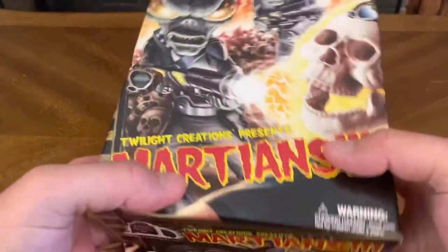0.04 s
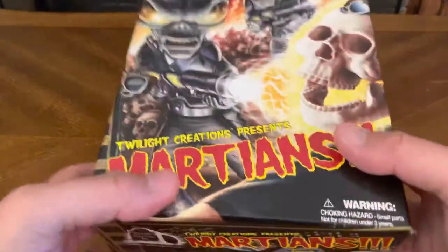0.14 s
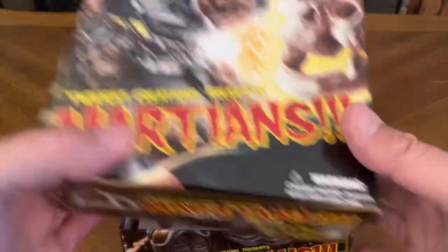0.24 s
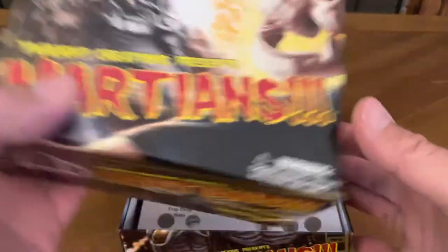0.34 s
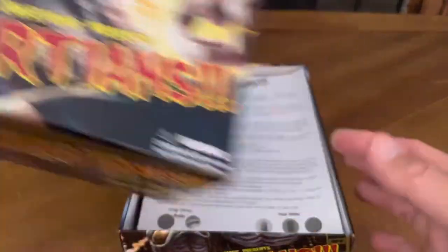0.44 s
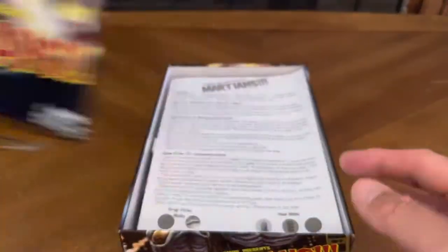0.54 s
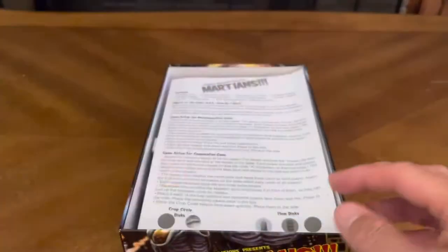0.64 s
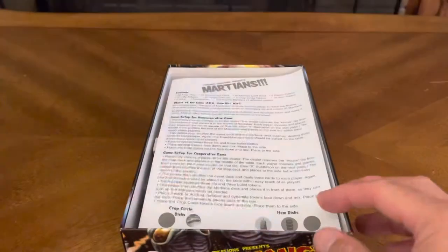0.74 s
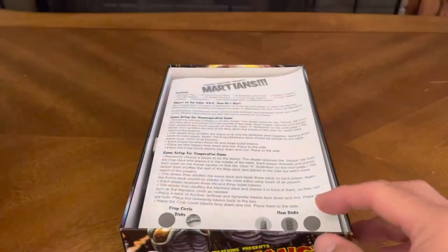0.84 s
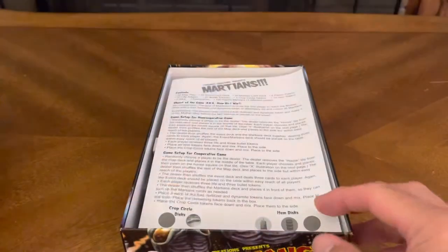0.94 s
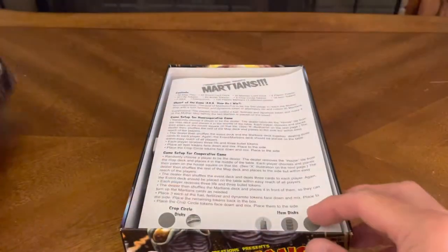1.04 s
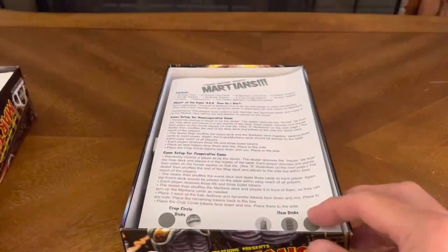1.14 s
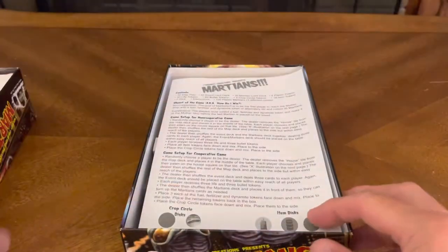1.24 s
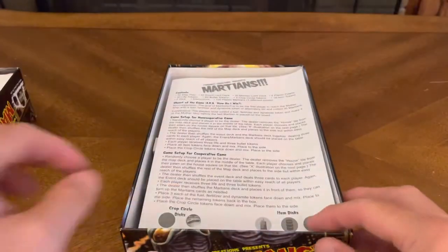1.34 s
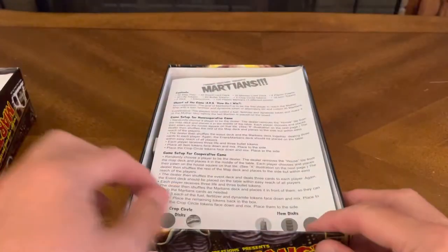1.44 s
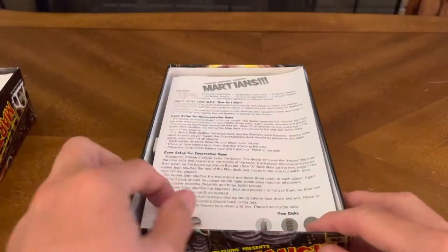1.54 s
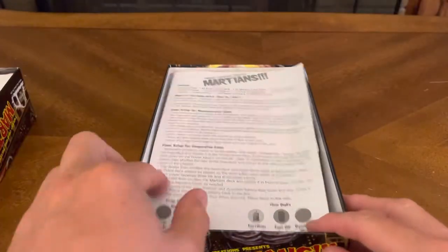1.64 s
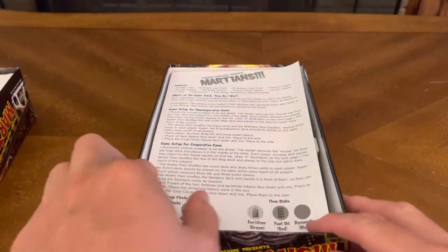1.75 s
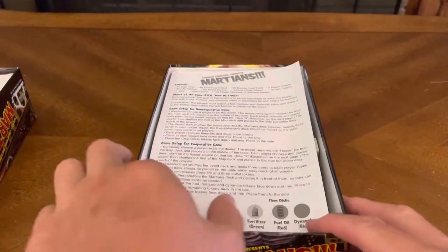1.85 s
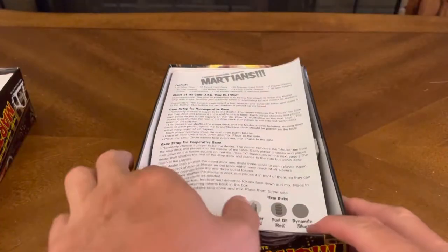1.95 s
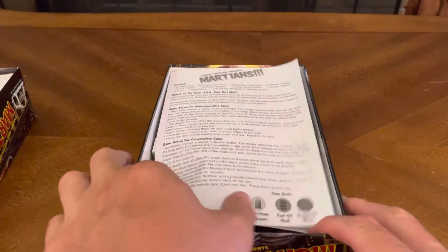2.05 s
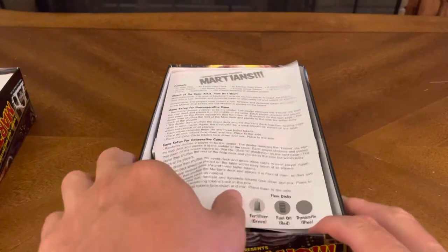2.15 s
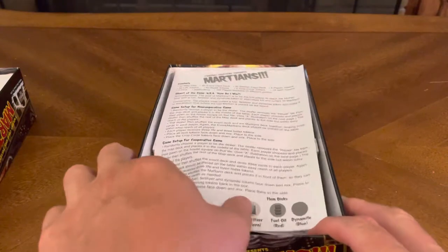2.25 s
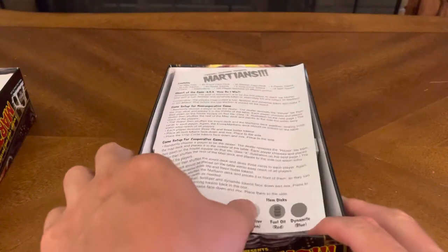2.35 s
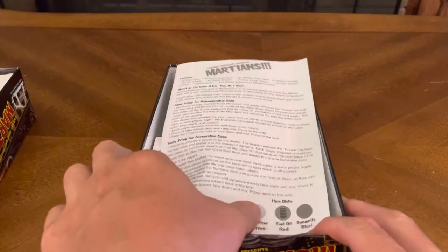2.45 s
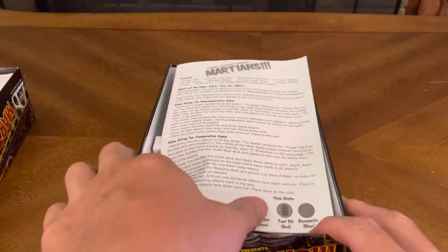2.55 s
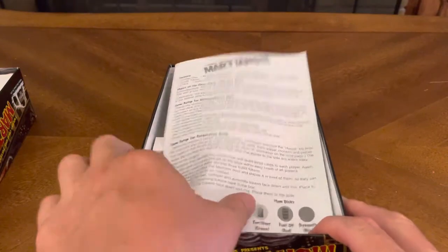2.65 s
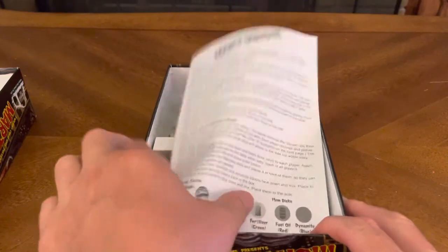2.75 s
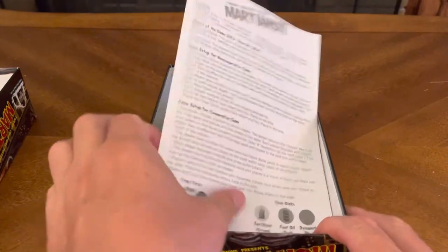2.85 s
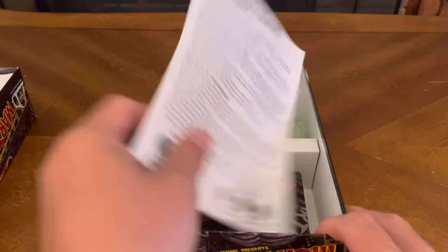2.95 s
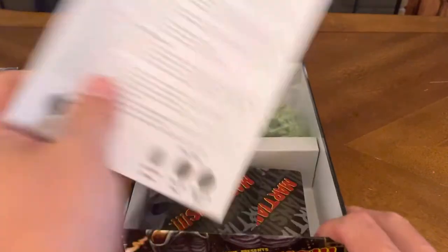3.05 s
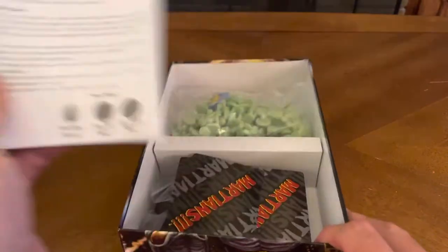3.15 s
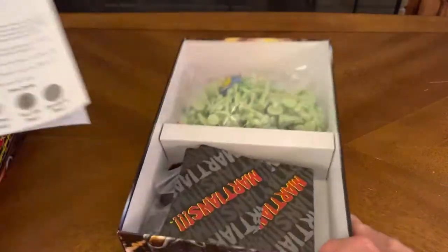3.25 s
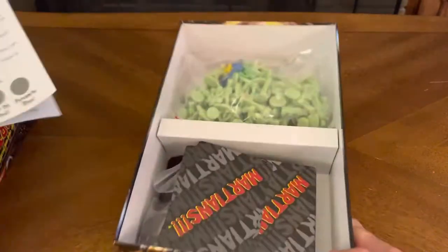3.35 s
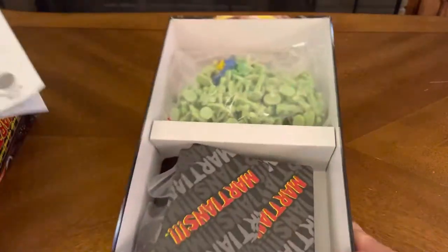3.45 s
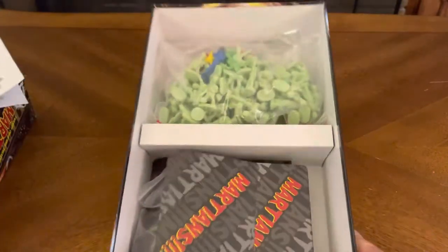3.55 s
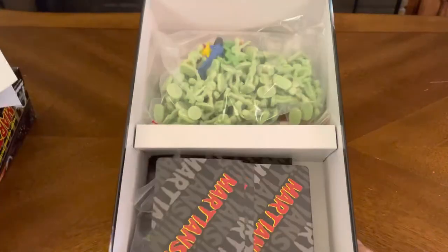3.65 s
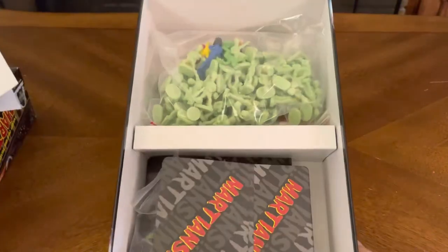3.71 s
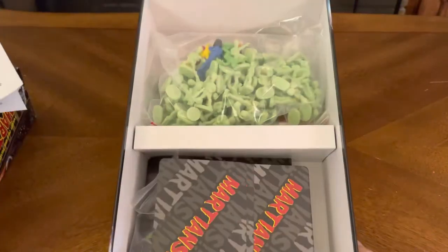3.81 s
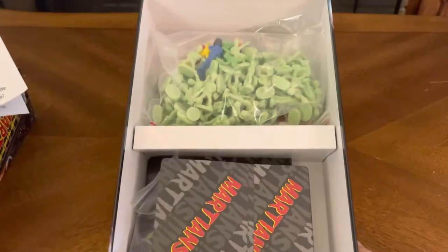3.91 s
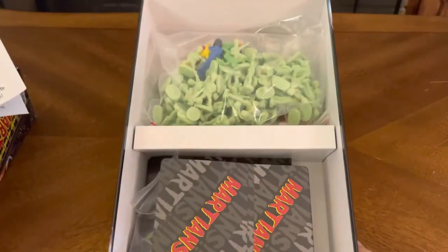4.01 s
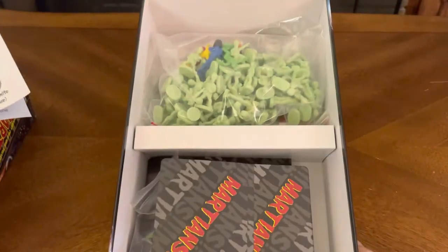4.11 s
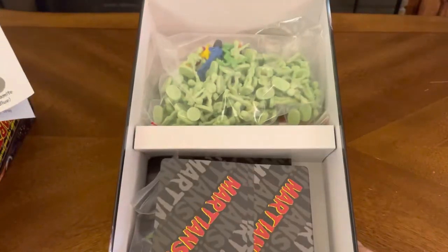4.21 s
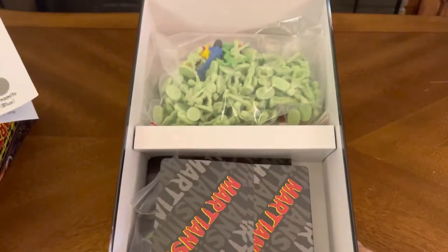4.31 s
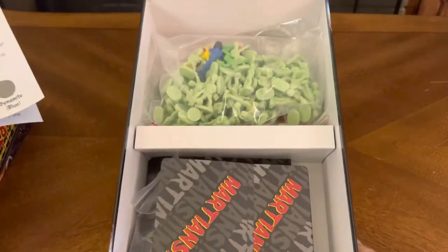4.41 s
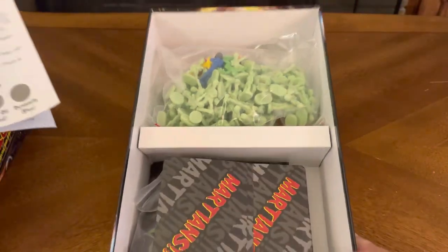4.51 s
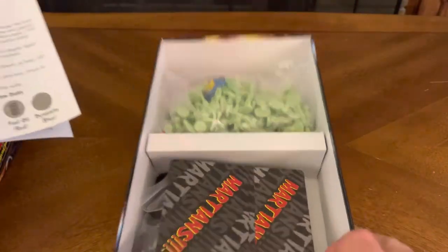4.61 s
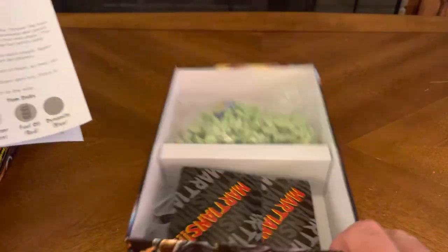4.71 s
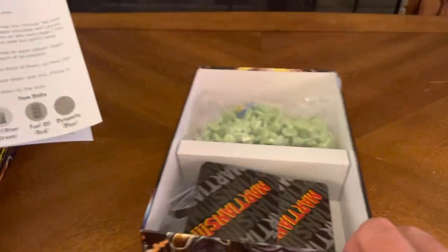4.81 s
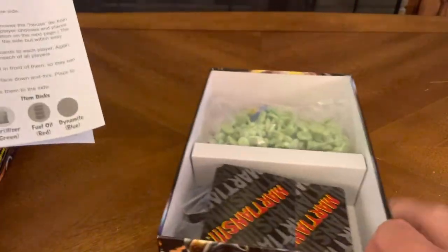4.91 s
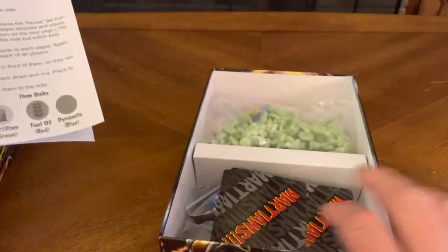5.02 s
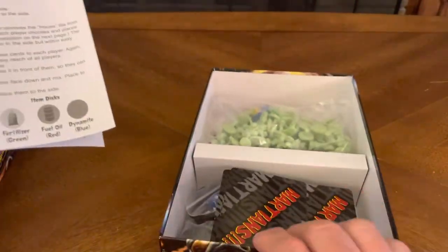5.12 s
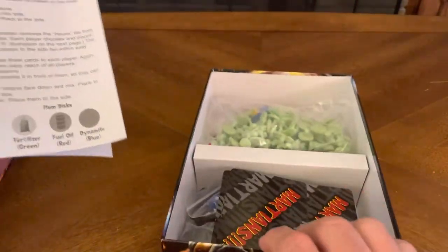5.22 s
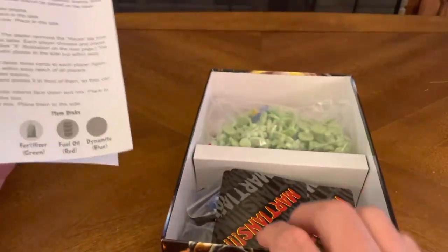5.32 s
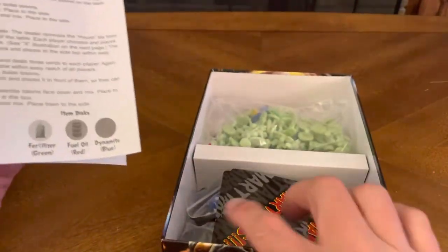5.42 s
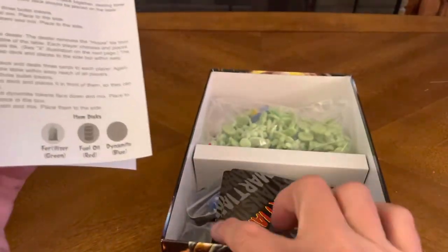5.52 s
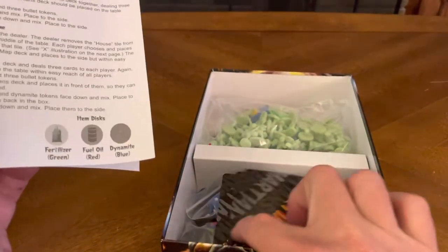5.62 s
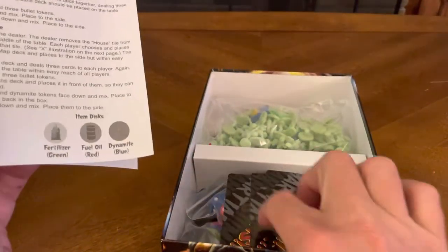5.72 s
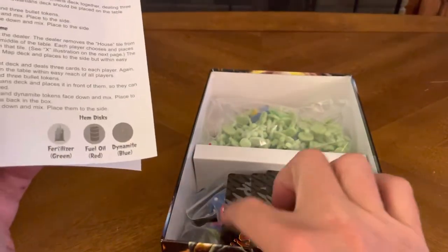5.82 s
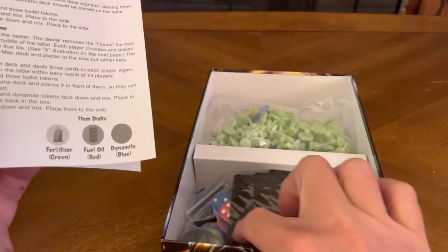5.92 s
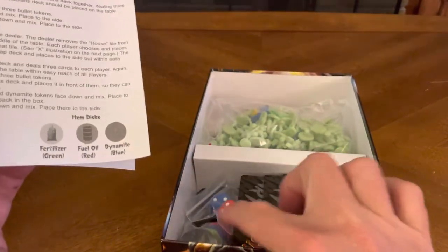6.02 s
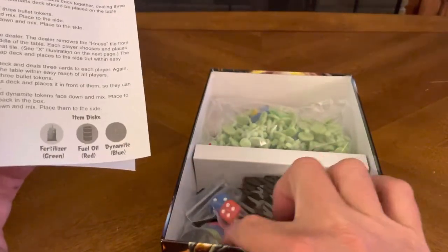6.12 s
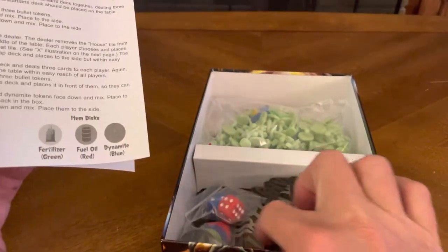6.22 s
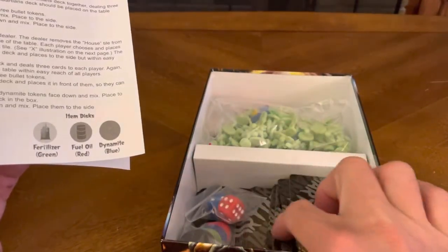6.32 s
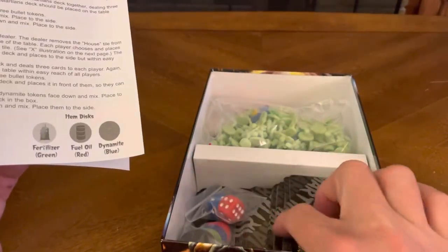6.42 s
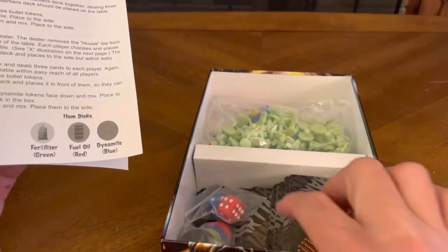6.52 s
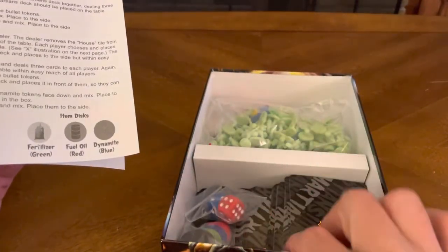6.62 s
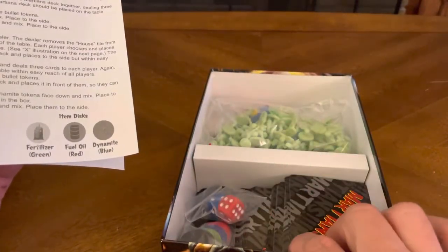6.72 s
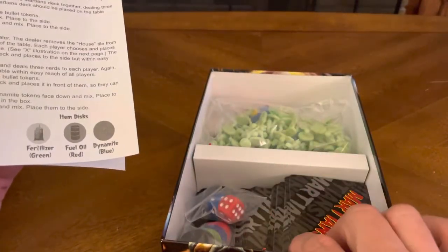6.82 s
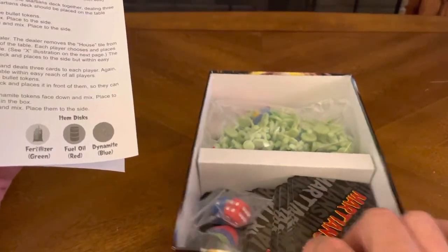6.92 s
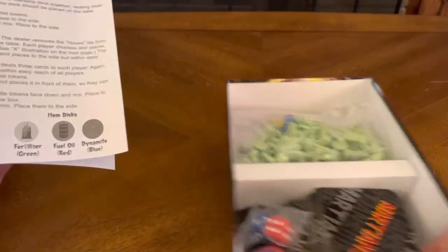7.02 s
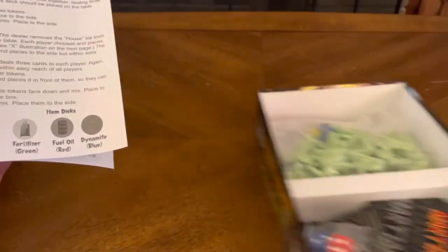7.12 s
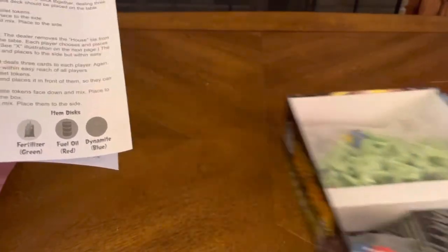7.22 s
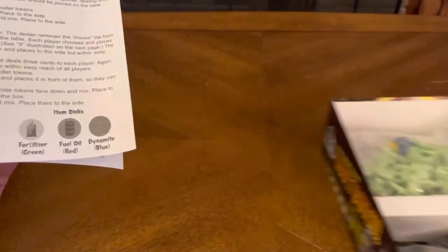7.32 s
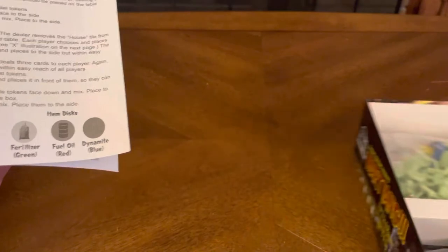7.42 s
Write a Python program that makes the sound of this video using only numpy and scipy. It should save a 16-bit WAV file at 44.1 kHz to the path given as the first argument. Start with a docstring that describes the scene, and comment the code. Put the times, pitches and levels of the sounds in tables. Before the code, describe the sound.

Close unboxing in a quiet humming room: lid knock, raspy booklet pulls, cardboard creaks, a hard box thud, card rustling, a final scrape.

```python
"""A cardboard game box is unpacked on a wooden table, in a quiet room with a low rumble and hum.
The lid drops and rocks on the table, then a paper booklet is pried out in separate, droning pulls.
The box creaks as it is tilted and lands flat; fingers sort through cards and a plastic bag.
At last the box scrapes away over the wood and judders to a stop.
Blows ring decaying modes, friction is coloured noise with grains, and two microphone ports hear it all."""
import sys
import numpy as np
from scipy import signal
from scipy.fft import rfft, irfft, next_fast_len
from scipy.io import wavfile
from scipy.ndimage import uniform_filter1d, map_coordinates

SR = 44100
rng = np.random.default_rng(int(sys.argv[2]) if len(sys.argv) > 2 else 0)


def put_to_file(sound):
    """Save the sound as 16-bit audio at rate SR, in the file named by the first command-line argument."""
    columns = np.atleast_2d(sound).T  # one column per channel
    safe = np.clip(columns, -1, 1)
    whole_steps = np.round(safe * 32767)
    wavfile.write(sys.argv[1], SR, whole_steps.astype(np.int16))


N = 328986
TIME = np.arange(N) / SR  # the whole scene, in seconds
HIT_TIME = np.arange(SR // 4) / SR  # one blow, in seconds

# Colour of a crack of board or paper. Each row: frequency in Hz, relative level in dB.
CRACK_COLOUR = [(300, -19.5), (1000, 0), (2400, 3), (4000, -5.5), (12000, -24)]


def amp(db):
    """Decibels to gain."""
    return 10 ** (np.asarray(db) / 20)


def unit(x):
    """Scaled to rms 1."""
    return x / np.sqrt(np.mean(x ** 2) + 1e-20)


def along(points, hz):
    """Read (Hz, value) points at any frequency, on a log axis."""
    f, v = np.transpose(points)
    return np.interp(np.log(hz + 1), np.log(f + 1), v)


def wobble(rate):
    """A smooth random curve, rate knots a second."""
    knots = rng.standard_normal(int(N * rate / SR) + 4)
    return map_coordinates(knots, [TIME * rate])


def filtered(x, response):
    """x times a response of frequency."""
    size = x.shape[-1]
    padded = next_fast_len(size + 8192)
    hz = np.fft.rfftfreq(padded, 1 / SR)
    return irfft(rfft(x, padded) * response(hz), padded)[..., :size]


def coloured(x, spectrum):
    """x given a spectrum, at rms 1."""
    return unit(filtered(x, lambda hz: amp(along(spectrum, hz))))


def add(track, s, sound):
    """Mix a sound in at s seconds."""
    part = track[max(round(s * SR), 0):][:len(sound)]
    part += sound[:len(part)]


def stroke(start, length):
    """Contact builds up, holds and lets go."""
    attack_s, release_s = 0.015, 0.047
    rise = (TIME - start) / attack_s + .5
    fall = (start + length - TIME) / release_s + .5
    return np.clip(np.minimum(rise, fall), 0, 1)


def swell(start, length):
    """A smooth rise and fall."""
    return np.abs(np.sin(np.pi * np.clip((TIME - start) / length, 0, 1)))


def in_room(x, wet_db=-13.0, early_t60=.07, wide_hz=180, dull_hz=7000):
    """Direct sound, early reflections of opposite sign at the two sides, and the room's tail.
    Each quarter-second stretch of sound gets freshly drawn random reflections and tail."""
    # Decay of the room. Each row: frequency in Hz, time to fall by 60 dB in seconds.
    room_decay = [(150, 0.26), (1000, 0.3), (14000, 0.21)]
    early_gain = amp(-4.5)
    sides = np.array([[1], [-1]])
    block = SR // 4
    out = np.tile(x, (2, 1))
    for start in range(0, N, block):
        part = x[start:start + block]
        if np.abs(part).max() < amp(-100):  # nothing to reflect
            continue
        hz, t, z = signal.stft(rng.standard_normal((2, SR // 2)), SR, nperseg=256)
        decaying = z * amp(-60 * t / along(room_decay, hz)[:, None])
        mid, side = signal.istft(decaying, SR, nperseg=256)[1]
        tail = mid + .5 * sides * side
        tail = tail / np.linalg.norm(tail[0])
        response = amp(wet_db) * np.pad(tail, ((0, 0), (SR // 100, 0)))  # the tail comes 10 ms late
        early = rng.standard_normal(len(HIT_TIME)) * amp(-60 * HIT_TIME / early_t60)
        early = early / np.linalg.norm(early)
        # long waves reach both sides alike, short ones are absorbed
        early = filtered(early, lambda f: f / (f + wide_hz) / (1 + (f / dull_hz) ** 2))
        response[:, :len(early)] += early_gain * sides * early
        for channel, answer in zip(out, signal.fftconvolve(part[None], response, axes=1)):
            add(channel, start / SR, answer)
    return out


def ring(modes, attack, scuff_db, stretch=1, detune=0, bend=0, scuff_t60=0.078):
    """One blow on a set of modes, peak 1; the contact scuffs on for a moment and keeps exciting them."""
    hz, db, t60 = np.transpose(modes)[:, :, None]
    relax_s = 0.003  # with bend, a struck panel starts taut and sharp, then settles to its pitch
    # each contact point excites the modes differently
    size, shift = rng.standard_normal((2, len(modes), 1))
    sign = (-1) ** np.arange(len(modes))[:, None]  # neighbouring modes swing in opposite senses
    bent_time = HIT_TIME + bend * relax_s * (1 - np.exp(-HIT_TIME / relax_s))
    pitch = hz * stretch * np.exp(detune * shift)
    waves = sign * np.sin(2 * np.pi * pitch * bent_time)
    x = np.sum(waves * amp(db + 2 * size - 60 * HIT_TIME / t60), axis=0)
    x = x * (1 - np.exp(-HIT_TIME / attack))
    scuff = rng.standard_normal(len(x)) * amp(-60 * HIT_TIME / scuff_t60)
    scuffed = signal.fftconvolve(x, scuff / np.linalg.norm(scuff))[:len(x)]
    x = x + amp(scuff_db) * scuffed
    return x / np.abs(x).max()


def burst(spectrum, t60, tail_db, tail_t60, rise=0.00028):
    """A crack of noise followed by a weaker chatter."""
    fade = amp(-60 * HIT_TIME / t60) + amp(tail_db - 60 * HIT_TIME / tail_t60)
    noise = coloured(rng.standard_normal(len(HIT_TIME)), spectrum)
    return noise * fade * (1 - np.exp(-HIT_TIME / rise))


def crack():
    """Board slaps on wood, and loose things chatter after it."""
    return burst(CRACK_COLOUR, t60=0.012, tail_db=-21.5, tail_t60=0.265)


def flex():
    """A hard blow bends the whole board: countless damped modes blur into a short, dull crunch."""
    # Colour of the crunch. Each row: frequency in Hz, relative level in dB.
    flex_colour = [(220, -12.5), (720, 5), (2800, -20), (8000, -35.5)]
    crunch_db = -5  # against the board's ring
    return amp(crunch_db) * burst(flex_colour, t60=0.02, tail_db=-15, tail_t60=0.12)


def friction(spectrum, grain_rate, grain_db, flutter_db, patchy_db=2.5):
    """Fibres catch and let go: sparse grains over a rush whose colour shifts as the sheet bends."""
    z = signal.stft(rng.standard_normal(N), nperseg=512)[2]
    field = uniform_filter1d(rng.standard_normal(z.shape), size=7, axis=0)  # smooth over frequency
    field = uniform_filter1d(field, size=9, axis=1)  # and over time
    rush = signal.istft(z * amp(patchy_db * unit(field)), nperseg=512)[1][:N]
    catches = (rng.random(N) < grain_rate / SR) * rng.standard_normal(N)  # grain_rate a second
    rubbing = coloured(unit(rush) + amp(grain_db) * unit(catches), spectrum)
    return unit(rubbing * amp(flutter_db * wobble(60)))


def drone():
    """Dragging makes the box wall drone."""
    # Colour of the droning wall. Each row: frequency in Hz, relative level in dB.
    drone_colour = [(250, -9.5), (400, -9), (540, 4), (1150, -11.5), (2000, -19), (4000, -50)]
    return friction(drone_colour, grain_rate=250, grain_db=-4, flutter_db=2.5)


def hiss():
    """Paper fibres hiss as they slide."""
    # Colour of sliding paper. Each row: frequency in Hz, relative level in dB.
    hiss_colour = [(400, -22.5), (1200, -6), (2600, -5), (4600, -11.5), (7000, -11), (9000, -20.5),
                   (13000, -16), (14500, -36)]
    return friction(hiss_colour, grain_rate=150, grain_db=-5.5, flutter_db=4.5)


def room_tone(spread=0.14):
    """Low ventilation rumble, slightly wide, with the unsteady hum of an appliance in the middle."""
    # Colour of the rumble. Each row: frequency in Hz, relative level in dB.
    air_colour = [(20, -25), (55, -2.5), (85, -5.5), (250, -17.5), (340, -24), (800, -39), (3200, -64.5),
                  (14000, -72)]
    # Partials of the hum. Each row: frequency in Hz, middle level in dB rms.
    hum_partials = [(59.2, -48.5), (118.4, -58), (161.5, -60.5), (247.6, -63)]
    mid, side = coloured(rng.standard_normal((2, N)), air_colour)
    hum = np.zeros(N)
    for hz, db in hum_partials:
        level = amp(db + 2.0 * wobble(2.6)) * np.sqrt(2)
        hum += level * np.sin(2 * np.pi * hz * TIME + 0.21 * wobble(2.8))
    return amp(-49.5) * np.array([mid + spread * side, mid - spread * side]) + hum


def rubs(fingers_db=-79, fingers_until_s=2.2):
    """Sliding board hisses and sets the box walls droning; fingers rustle faintly early on."""
    # Board rubs on board or under a finger. Each row: start in seconds, length in seconds, level in dB.
    rub_strokes = [(0, 0.087, -48), (0.237, 0.1, -53.5), (0.721, 0.065, -55.5), (1.483, 0.22, -55.5),
                   (3.123, 0.08, -60), (4.61, 0.08, -59.5), (4.673, 0.27, -51), (5.091, 0.25, -70),
                   (5.457, 0.017, -57), (6.404, 0.029, -50.5), (6.57, 0.027, -54)]
    hiss_db = -11  # against the drone of the wall
    contact = sum(amp(db) * stroke(start, length) for start, length, db in rub_strokes)
    fingers = (TIME < fingers_until_s) * amp(fingers_db)
    return in_room(contact * drone() + (amp(hiss_db) * contact + fingers) * hiss())


def moans(waver=0.0547, overtone_db=-20):
    """Skin sticks and slips on the box wall, a wavering tone with a faint octave above."""
    # A thumb drags on the wall. Each row: start in seconds, length in seconds, middle pitch in Hz,
    # level in dB.
    thumb_drags = [(1.964, 0.0324, 531, -36), (2.099, 0.085, 531, -40.5)]
    x = np.zeros(N)
    drift = 1 + waver * wobble(70)
    for s, length, hz, db in thumb_drags:
        phase = 2 * np.pi * np.cumsum(hz * drift) / SR
        tone = np.sin(phase) + amp(overtone_db) * np.sin(2 * phase)
        x += amp(db) * swell(s, length) * tone
    return in_room(x * amp(4.2 * wobble(62)), wet_db=-5)


def swishes(below_db=-15, above_db=-15):
    """A sheet of paper or board brushes past an edge; each pass hisses around its own pitch."""
    # Each row: start in seconds, length in seconds, centre in Hz, level in dB.
    passes = [(1.598, 0.07, 6740, -57.5), (2.037, 0.029, 4940, -55.5), (2.18, 0.045, 6400, -50.5),
              (2.501, 0.035, 3200, -52), (2.868, 0.07, 5740, -50), (3.382, 0.3, 4500, -78.5)]
    x = np.zeros(N)
    for start, length, hz, db in passes:
        colour = [(hz / 4, below_db), (hz, 0), (hz * 2, above_db)]
        x += amp(db) * swell(start, length) * coloured(rng.standard_normal(N), colour)
    return in_room(x)


def snaps():
    """Thin sheets of paper and plastic buckle with a bright, ringless click."""
    # Each row: time in seconds, click level in dB, sizzle level in dB.
    buckles = [(1.9111, -45.5, -40), (2.339, -35.5, -51.5), (2.507, -34.5, -50), (2.647, -36.5, -39),
               (2.676, -28, -37.5), (2.694, -39, -42.5), (2.769, -29, -43.5), (5.618, -39, -46.5),
               (5.644, -39, -51), (5.7132, -62, -40.5), (6.125, -26.5, -35.5), (6.296, -26.5, -47),
               (6.565, -51, -86), (6.626, -48, -53)]
    # Colour of the click. Each row: frequency in Hz, relative level in dB.
    click_colour = [(300, 9), (800, 16.5), (2000, 6.5), (3500, -2), (6000, -32), (12000, -31)]
    # Colour of the sizzle. Each row: frequency in Hz, relative level in dB.
    sizzle_colour = [(1500, -22.5), (5000, 1), (7000, -3.5), (12000, -15), (16000, -7.5)]
    x = np.zeros(N)
    for s, click_db, sizzle_db in buckles:
        for db, colour in (click_db, click_colour), (sizzle_db, sizzle_colour):
            add(x, s, amp(db) * burst(colour, t60=0.023, tail_db=-19.5, tail_t60=0.045))
    return in_room(x, wet_db=-15.5)


def rustles():
    """Fingers shift the cards: their edges scrape and the thin plastic bag crinkles under them."""
    # Each row: start in seconds, length in seconds, level in dB.
    shifts = [(5.541, 0.079, -58), (5.645, 0.047, -42.5), (5.858, 0.11, -54), (6.071, 0.12, -53.5),
              (6.224, .07, -55)]
    # Colour of cards on the bag. Each row: frequency in Hz, relative level in dB.
    bag_colour = [(350, -6.5), (800, -1.5), (2000, 0), (4200, -6), (12000, -20), (15000, -27.5)]
    contact = sum(amp(db) * stroke(start, length) for start, length, db in shifts)
    return in_room(contact * friction(bag_colour, grain_rate=200, grain_db=-1, flutter_db=1.5))


def taps(radiate_hz=500):
    """Light blows ring the stiff box wall for a few cycles; so small a panel radiates little bass."""
    # Fingers, booklet edge and cards tap the walls. Each row: time in seconds, wall level in dB,
    # crack level in dB.
    touches = [(0.29, -37, -46.5), (1.622, -27, -42), (2.044, -35, -48), (2.207, -22.5, -38.5),
               (2.411, -23.5, -47.5), (2.715, -30.5, -51.5), (2.746, -22, -26), (2.815, -20, -42.5),
               (2.824, -23, -30.5), (2.954, -26.5, -39.5), (2.987, -27.5, -40), (4.905, -28, -46.5),
               (4.924, -32.5, -41), (5.549, -25.5, -74), (5.862, -23, -37.5), (6.075, -22.5, -52.5),
               (6.104, -20, -39), (6.196, -26.5, -55), (6.21, -16, -58), (6.253, -15, -33),
               (6.309, -36, -50), (6.439, -32, -61), (6.846, -37, -52)]
    # Modes of the wall, detuned at each blow. Each row: middle pitch in Hz, middle level in dB,
    # time to fall by 60 dB in seconds.
    wall_modes = [(620, 0, 0.045), (797.3, 5, 0.033), (890, 5, 0.021), (1106, -6, 0.028),
                  (1332, -3.5, 0.025), (1655, -14.5, 0.053), (2230, -11, 0.025)]
    rebound_s, loss_db = .011, 14.5  # every tap bounces once
    rebounds = [(s + rebound_s, db - loss_db, crack_db - loss_db) for s, db, crack_db in touches]
    # the sliding box judders to a stop in three equal bumps
    judder_s, gap_s, judder_db, judder_crack_db = 7.386, .0125, -19.5, -39.5
    judder = [(judder_s + k * gap_s, judder_db, judder_crack_db) for k in range(3)]
    x = np.zeros(N)
    for s, wall_db, crack_db in [*touches, *rebounds, *judder]:
        add(x, s, amp(wall_db) * ring(wall_modes, attack=0.00013, scuff_db=-7, detune=0.076))
        add(x, s, amp(crack_db) * burst(CRACK_COLOUR, t60=0.014, tail_db=-12, tail_t60=0.044))
    x = signal.sosfilt(signal.butter(2, radiate_hz, "highpass", fs=SR, output="sos"), x)
    return in_room(x)


def booklet():
    """The paper edge drags on the wall and sets it droning; the sheets hiss and crackle as they come free."""
    # The separate pulls. Each row: start in seconds, length in seconds, effort in dB.
    pulls = [(1.802, 0.16, -48), (2.019, 0.13, -43.5), (2.17, 0.14, -40.5), (2.344, 0.086, -36),
             (2.465, 0.128, -42.5), (2.666, 0.11, -38.5), (2.75, 0.18, -41), (2.933, 0.135, -50.5)]
    # from here on the paper works loose: the wall drones less and the sheets hiss more
    freeing_s, drone_fall_db_per_s, hiss_rise_db_per_s = 1.9, 8, 11.5
    hiss_db, crackle_db = -21, -18  # against the effort; the hiss as it is before the paper loosens
    effort = sum(amp(db) * stroke(start, length) for start, length, db in pulls)
    loose_s = np.clip(TIME - freeing_s, 0, 2)
    wall = amp(-drone_fall_db_per_s * loose_s) * drone()
    sheets = amp(hiss_db + hiss_rise_db_per_s * loose_s) * hiss()
    crackle = amp(crackle_db) * friction(CRACK_COLOUR, grain_rate=44, grain_db=14, flutter_db=3.5)
    return in_room(effort * (wall + sheets + crackle))


def creaks(tick_db=-9, muffle_hz=3100):
    """Each slip of the tilted box ticks and plucks the folded board; the soft board swallows the treble."""
    # Each row: time in seconds, level in dB.
    slips = [(3.272, -44), (3.32, -32), (3.448, -41.5), (3.502, -34), (3.558, -31), (3.6, -18),
             (3.673, -21.5), (3.772, -23.5), (3.819, -28), (3.879, -29.5), (3.913, -35.5), (3.954, -32),
             (3.982, -46.5), (4.013, -38), (4.061, -44.5)]
    # Modes of the fold, plucked at a slightly different place each time. Each row: middle pitch in Hz,
    # middle level in dB, time to fall by 60 dB in seconds.
    fold_modes = [(664, -7.5, 0.019), (905, 1.5, 0.022), (1390, 7, 0.0086), (1705, 0, 0.0095),
                  (2034, 3.5, 0.0066), (2930, -18, 0.01)]
    x = np.zeros(N)
    for s, db in slips:
        pluck = ring(fold_modes, attack=0.0018, scuff_db=-14, detune=0.045)
        add(x, s, amp(db) * (pluck + amp(tick_db) * crack()))
    x = signal.sosfilt(signal.butter(4, muffle_hz, fs=SR, output="sos"), x)
    return in_room(x, wet_db=-15.5)


def slide():
    """The box bottom scrapes over the wood, louder as it gathers speed, then fainter."""
    # The push across the table. Each row: time in seconds, scrape level in dB.
    push = [(6.84, -64), (6.93, -48.5), (7.17, -43.5), (7.25, -49.5), (7.46, -53)]
    # Colour of board on wood. Each row: frequency in Hz, relative level in dB.
    scrape_colour = [(300, -4.5), (800, 1.5), (1500, -8), (2250, -2), (3300, -8.5), (4500, -6),
                     (5500, -7.5), (13000, -18)]
    s, db = np.transpose(push)
    level = amp(np.interp(TIME, s, db, left=-np.inf))  # silent before the push
    scrape = friction(scrape_colour, grain_rate=2800, grain_db=-4, flutter_db=2.0, patchy_db=2.55)
    return in_room(level * scrape)


def lid():
    """The hollow lid drops on one edge, then on the other, and rocks; its trapped air booms."""
    # Each row: time in seconds, board level in dB, thump level in dB, crack level in dB,
    # contact time in seconds.
    lid_blows = [(1.035, -16, -32.5, -45.5, 0.00065), (1.040, -7.5, -20.5, -12, 0.0003),
                 (1.054, -12.5, -12.5, -30, 0.0013), (1.117, -21, -31, -36, 0.00095),
                 (1.127, -16, -27.5, -30.5, 0.00109), (1.133, -26, -18, -27.5, 0.0006)]
    # Modes of the lid's board. Each row: pitch in Hz, level in dB before the contact dulls it,
    # time to fall by 60 dB in seconds.
    lid_modes = [(376, -7.5, 0.12), (499, -2, 0.014), (740, -2, 0.15), (841, -6, 0.081), (967, 1, 0.008),
                 (1263, -6, 0.018), (2060, -6.5, 0.02816), (2800, -20.5, 0.06), (3357, -9.5, 0.016)]
    # Modes of the air under it. Each row: pitch in Hz, middle level in dB, time to fall by 60 dB in seconds.
    air_modes = [(169.6, -2, 0.17), (206.1, -6, 0.07), (293, -2, .05)]
    x = np.zeros(N)
    for s, board_db, thump_db, crack_db, contact in lid_blows:
        # a soft, long contact is dull
        excited = [(hz, db - 10 * np.log10(1 + (hz * contact) ** 2), t60) for hz, db, t60 in lid_modes]
        add(x, s, amp(board_db) * (ring(excited, attack=contact, scuff_db=-5.5) + flex()))
        add(x, s, amp(thump_db) * ring(air_modes, attack=0.0012, scuff_db=-15.0))
        add(x, s, amp(crack_db) * crack())
    return in_room(x, wet_db=-10.0)


def box():
    """The loaded box lands or is bumped, its note dropping as the bottom relaxes; the table thumps."""
    # Each row: time in seconds, board level in dB, thump level in dB, crack level in dB,
    # thump pitch as a ratio.
    box_blows = [(0.069, -40.5, -32.5, -44, 1.56), (0.254, -34.5, -35, -43.5, 1.81),
                 (0.338, -64, -28, -62, 0.69), (3.028, -31.5, -23.5, -37, 1.55),
                 (4.7008, -4.5, -17, -19, 1), (4.721, -20, -15.5, -41.5, 0.96)]
    # Modes of the box. Each row: settled pitch in Hz, middle level in dB, time to fall by 60 dB in seconds.
    box_modes = [(379, -13, 0.1), (492, 4.5, 0.027), (596.3, -3, 0.1), (807, -8.5, 0.05), (883, -7, 0.11),
                 (1115, -12.5, 0.15), (1593, -9, 0.07), (2032, -10.5, 0.022)]
    # Modes of the thump. Each row: pitch in Hz at ratio 1, middle level in dB,
    # time to fall by 60 dB in seconds.
    thump_modes = [(89.2, -9, 0.13), (175, -2.5, 0.1), (256, 3, 0.02)]
    x = np.zeros(N)
    for s, board_db, thump_db, crack_db, pitch in box_blows:
        add(x, s, amp(board_db) * (ring(box_modes, attack=0.0002, scuff_db=-12.5, bend=0.53) + flex()))
        add(x, s, amp(thump_db) * ring(thump_modes, attack=0.0013, scuff_db=-13.0, stretch=pitch))
        add(x, s, amp(crack_db) * crack())  # the plastic pieces shiver after it
    return in_room(x)


def scene():
    """Everything on the table, and the room behind it."""
    paper = booklet() + swishes() + snaps() + rustles()
    board = rubs() + moans() + taps() + creaks() + slide()
    return room_tone() + paper + board + lid() + box()


def record(dry):
    """The two microphone ports differ in level and treble phase; nothing passes above the band limit."""
    # Phase between the ports. Each row: frequency in Hz, left lead in radians.
    port_phase = [(100, 0), (600, -.2), (1500, .1), (4000, -.4), (6000, .5), (8300, 3.14), (10700, 6.1),
                  (12600, 6.5), (14200, 9)]
    # Balance of the ports. Each row: frequency in Hz, left minus right in dB.
    port_balance = [(100, 1.5), (700, 2.5), (2400, 2.5), (4800, 4), (7000, 0)]
    top_hz = 14400
    halves = np.array([[1], [-1]]) / 2  # each port takes half of the difference

    def ports(hz):
        """Gain and phase of each port."""
        gain = amp(halves * along(port_balance, hz))
        turn = np.exp(1j * halves * along(port_phase, hz))
        return gain * turn * (hz < top_hz)

    return filtered(dry, ports)


dry = scene()
out = record(dry)
put_to_file(out)
```